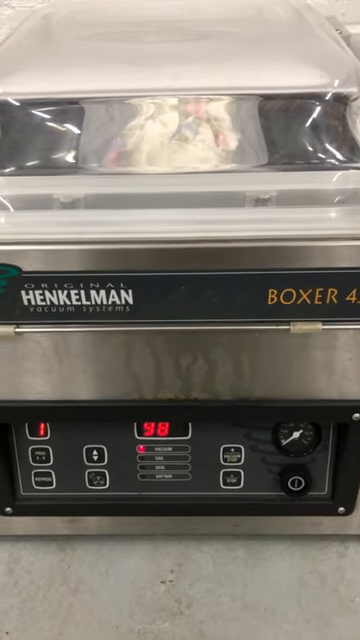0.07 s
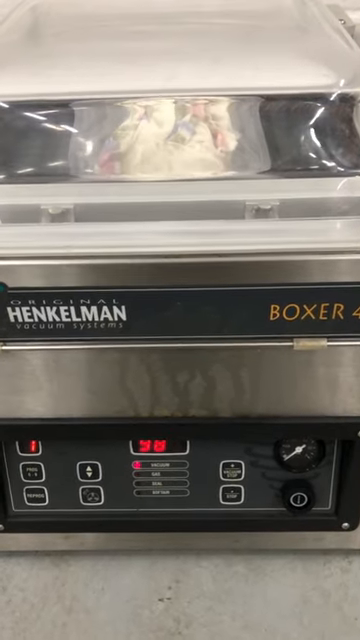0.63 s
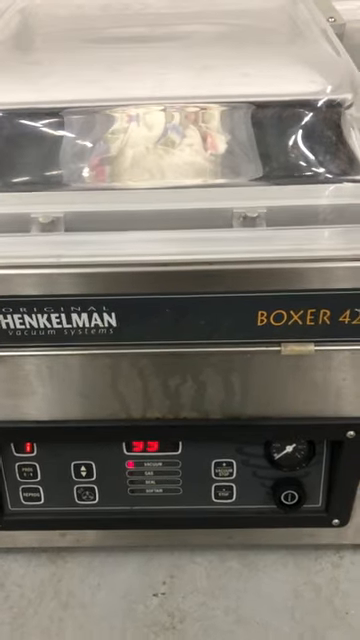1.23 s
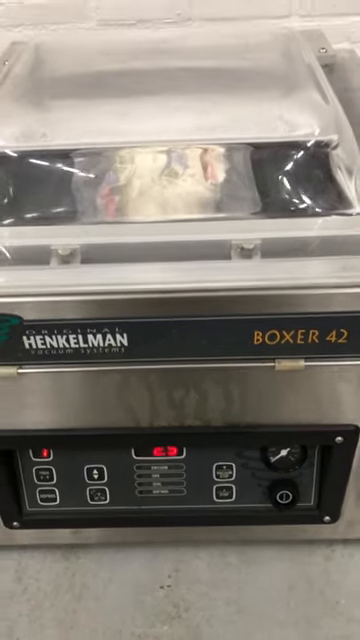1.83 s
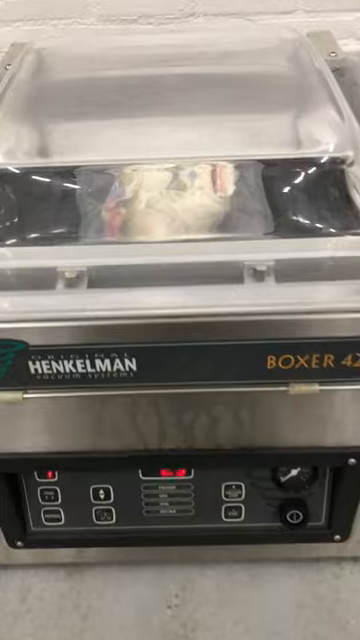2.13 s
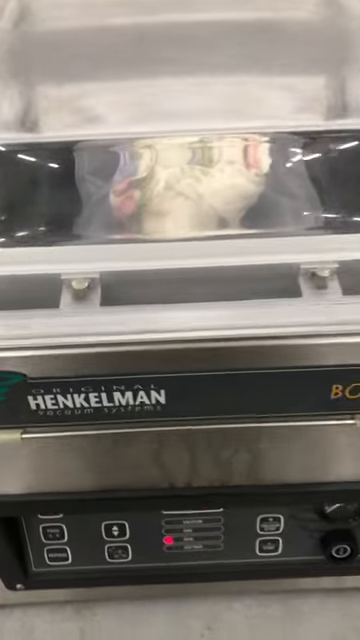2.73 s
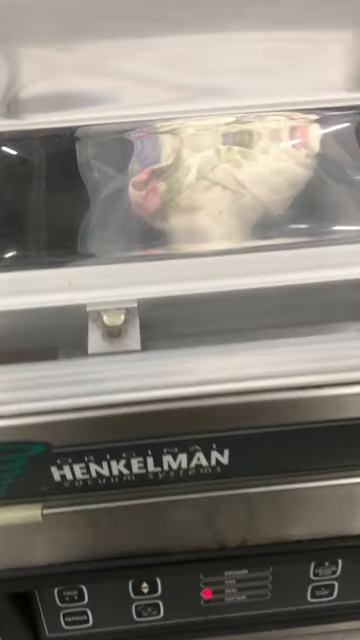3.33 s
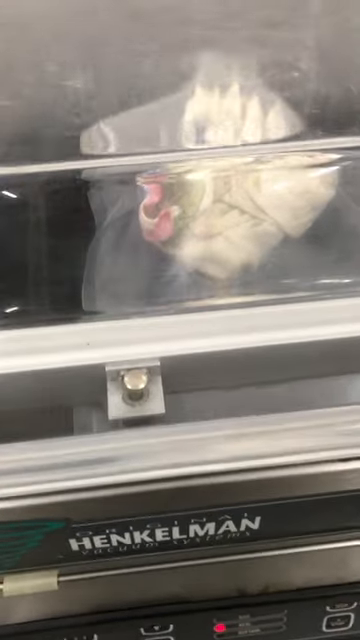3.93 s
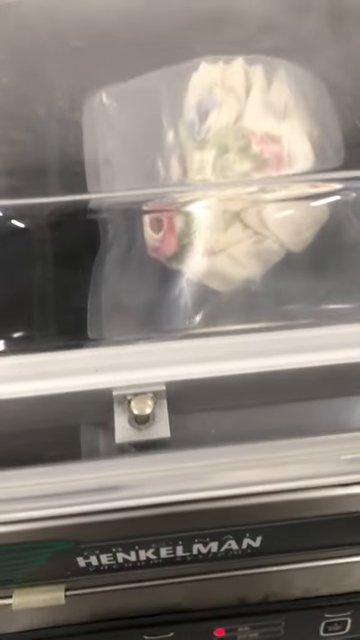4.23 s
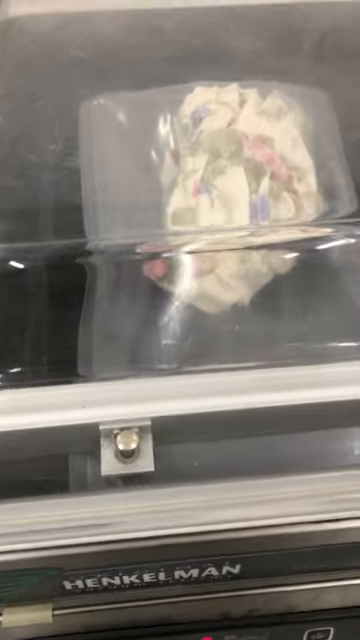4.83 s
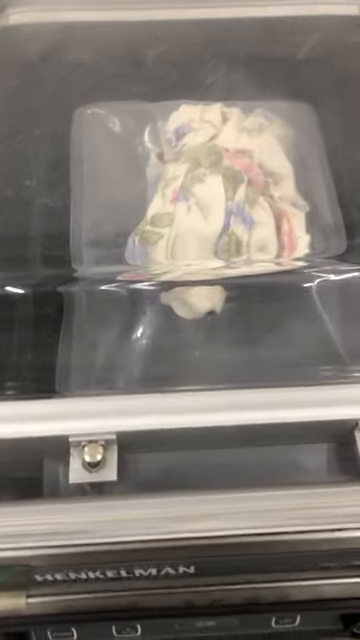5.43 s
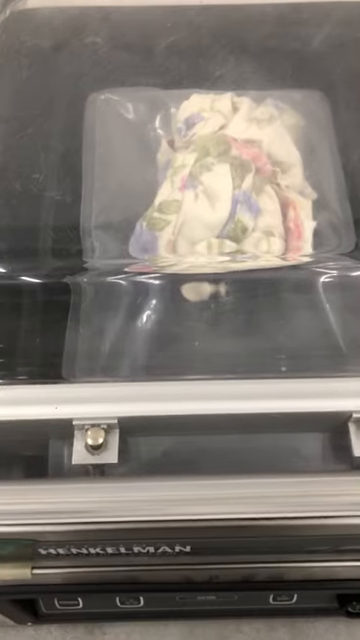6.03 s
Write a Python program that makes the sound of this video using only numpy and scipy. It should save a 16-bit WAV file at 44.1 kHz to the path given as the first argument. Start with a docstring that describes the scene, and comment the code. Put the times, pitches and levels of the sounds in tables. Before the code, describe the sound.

A loud vacuum sealing machine pump stops with a clack and hissing air, then the seal bar clunks and releases over steady ventilation.

```python
"""A hard-walled workroom, just in front of the lid of a chamber vacuum packer.
The vane pump drones, churns and rattles under the periodic pull of its motor, cuts out with a
double clack and runs down while a valve hisses and whistles. The heater transformer starts to sing
faintly; the seal bar clunks shut as air fills its cylinders, and a last clack releases it.
Film and lid tick now and then over the steady noise of the ventilation."""
import sys
import numpy as np
from scipy import signal
from scipy.fft import rfft, irfft
from scipy.io import wavfile
from scipy.ndimage import map_coordinates

SR = 44100
rng = np.random.default_rng(int(sys.argv[2]) if len(sys.argv) > 2 else 0)


def unload_audio(sound):
    """Save the sound as a 16-bit wav file, at the path given as the first command line argument."""
    columns = np.transpose(np.atleast_2d(sound))
    # keep every value between -1 and 1, then stretch to whole-number steps
    steps = np.round(np.clip(columns, -1, 1) * 32767)
    wavfile.write(sys.argv[1], SR, steps.astype(np.int16))


N = 272538
T = np.arange(N) / SR

# Levels in the tables are relative; each source applies its own gain.
# mains harmonics of the pump motor: (frequency [Hz], level [dB])
MOTOR_HARMONICS = [(100, -39), (200, -44.5), (250, -64.5), (300, -52), (350, -51.5), (400, -72),
                   (500, -52.5), (550, -56), (600, -58.5), (650, -78), (700, -52.5), (750, -49),
                   (850, -58.5), (900, -51), (1050, -55.5), (1550, -54.5), (1800, -56.5), (1850, -62),
                   (1900, -68), (2200, -59.5), (2400, -62.5), (3450, -64)]
# tones of the turning vanes: (frequency [multiple of shaft speed], level [dB])
VANE_ORDERS = [(3, -54.5), (7, -65), (12, -53.5), (18, -55.5), (19, -60), (23, -76), (30, -72.5),
               (33, -52.5), (42, -68), (60, -64), (80, -68)]
# oil and air churning in the pump: (frequency [Hz], level [dB])
CHURN_SPECTRUM = [(28, -43), (55, -30), (160, -2), (260, -5.5), (335, 5), (420, -1), (800, -3), (920, 3),
                  (1150, -1), (1560, 0.5), (1750, -5), (3400, -10), (4900, -17.5), (16000, -28.5)]
# buzz of the sliding vanes: (frequency [Hz], level [dB])
BUZZ_SPECTRUM = [(700, -39), (1100, -4), (1550, 3.5), (1750, -6), (2400, -8), (3500, -7), (3800, -21),
                 (4500, -4.5), (5200, -33), (9000, -21)]
# rattle of the housing: (frequency [Hz], level [dB])
RATTLE_SPECTRUM = [(1500, -18), (3000, 4.5), (5200, -6), (6500, 1), (7700, -2.5), (8800, 1), (11000, 0.5),
                   (12500, 4), (13500, -1.5), (16000, -1)]
# ventilation noise: (frequency [Hz], level [dB])
VENT_SPECTRUM = [(20, -43), (32, -19.5), (48, -2.5), (70, 1), (105, -0.5), (153, -3.5), (229, -5),
                 (270, -8.5), (489, -13), (677, -15), (1400, -21), (2410, -32), (14000, -46.5),
                 (16000, -51)]
# blows, by part: (time [s], level [dB], treble gain [dB], mid-band t60 [s], thump [dB], ring [dB])
IMPACTS = { "switch": [(1.5744, -24.5, 10, 0.14, -69, -56.5), (1.5995, -23, -3, 0.069, -38.5, -43)],
           "bar": [(2.566, -44, -3, 0.24, -85, -74.5), (2.5798, -16.5, 3.5, 0.064, -24.5, -38),
           (2.587, -25.5, 8.5, 0.097, -34, -61), (2.621, -43, -12, 0.1, -23.5, -73)],
           "release": [(5.063, -44.5, -5, 0.15, -86, -80), (5.0755, -26.5, 5, 0.1, -70, -47.5),
           (5.082, -33.5, -4, 0.08, -70, -70), (5.103, -33, -23, 0.12, -64, -51)], }
# colour of each striking part: (frequency [Hz], level [dB])
PART_SPECTRA = { "switch": [(60, -29), (170, -9), (450, -1.5), (650, -9), (1050, 6.5), (1300, 3.5),
                (1900, -5), (2300, -0.5), (3400, -7.5), (4500, -13), (8500, -14.5), (11000, -23),
                (16000, -21)], "bar": [(60, -46), (110, -23.5), (220, -3.5), (400, 0), (600, -11),
                (770, 2.5), (1100, -0.5), (1470, 5.5), (1900, 0), (2600, -8), (3300, 1.5), (3800, -4),
                (4300, -17), (5800, -14), (6900, -11), (8000, -21.5), (16000, -26)], "release": [(130, -29),
                (230, -6), (380, 0), (500, -5), (690, 0.5), (850, -2.5), (1300, 2.5), (2050, -6),
                (2750, -3.5), (3900, -11), (4500, -14.5), (7000, -19.5), (11000, -29.5), (16000, -28)], }
# modes of the steel panels: (frequency [Hz], level [dB], t60 [s])
PANEL_MODES = [(168.3, 0.5, 0.65), (207.4, 2.5, .4), (333, 2.5, 0.65), (372, 0.5, 0.26), (584, -7.5, 0.69),
               (782, -8, 0.79), (940, -25, 0.5), (1050, -2, 0.35), (1180, -7, 0.664), (1335, -23, .7),
               (1520, -15.5, .26), (3180, -24, 0.33), (3560, -22, 0.21)]
# the room's return of each part's sound: (level [dB])
REVERB_DB = {"switch": -16.5, "bar": -17, "release": -12.5}
# reverberation time of the room: (frequency [Hz], t60 [s])
ROOM_T60 = [(100, 1.48), (400, 0.91), (1200, 2), (3500, 1.23), (7000, 0.6), (15000, 0.33)]
# colour of the wall reflections: (frequency [Hz], level [dB])
WALL_SPECTRUM = [(170, -5.5), (330, 3.5), (1300, -4), (2500, -4.5), (7000, 0), (15000, 4.5)]
# air rushing through the valve: (frequency [Hz], level [dB])
HISS_SPECTRUM = [(1000, -18.5), (4500, -11), (6800, -3.5), (7900, -2), (8300, -5), (9600, -5),
                 (11500, -2.5), (12500, -3), (13800, 0), (15000, 0), (15500, 7), (16000, 1.5)]
# breathy whistle of the valve seat: (frequency [Hz], level [dB])
WHISTLE_SPECTRUM = [(6000, -38), (8200, -11), (8850, -5), (9500, -12.5), (12000, -50)]
# harmonics of the heater transformer: (frequency [Hz], level [dB])
CORE_HARMONICS = [(1500, -87.5), (1600, -83), (1700, -86.5), (1800, -76.5), (1900, -77), (2000, -74.5),
                  (2100, -74), (2200, -81.5), (2300, -81.5)]
# ticks of film and lid: (time [s], level [dB], centre frequency [Hz], half-width [octaves])
FILM_TICKS = [(2.189, -59, 11960, 0.81), (3.388, -68, 11000, .7), (3.6438, -45, 4100, 1.15),
              (3.942, -70, 9000, .9), (4.1955, -60, 13400, .3)]
# air filling the cylinders under the seal bar: (frequency [Hz], level [dB])
FILL_SPECTRUM = [(300, 3.5), (600, 0.5), (800, 9), (1000, -3.5), (1200, -6.5), (2300, -8), (3000, -4.5),
                 (3750, -10), (4200, -20), (5500, -20), (6500, -20), (8000, -51), (16000, -49.5)]

MAINS_HZ, PULL_HZ = 50, 100  # magnetic force peaks twice in each mains cycle
PUMP_DB, CUT_S = -1.53, 1.643  # the pump's gain holds until the power is cut


def amp(db):
    return 10 ** (np.asarray(db) / 20)


def unit(x):
    return x / np.sqrt(np.mean(x ** 2) + 1e-20)


def curve_at(points, hz):
    f, value = np.transpose(points)
    return np.interp(np.log(hz + 1), np.log(f + 1), value)


def add(mix, start_s, sound):
    part = mix[round(start_s * SR):][:len(sound)]
    part += sound[:len(part)]


def bins(size):
    return np.fft.rfftfreq(size, 1 / SR)


def ramp(start_s, length_s):
    return np.clip((T - start_s) / length_s, 0, 1)


def colour(x, spectrum, extra_db=0):
    """Linear filtering imposes a spectrum on x; the result has rms 1."""
    return unit(irfft(rfft(x) * amp(curve_at(spectrum, bins(len(x))) + extra_db), len(x)))


def drift(rate_hz):
    """Smooth random fluctuation, rms 1."""
    knots = rng.standard_normal(400)
    return unit(map_coordinates(knots, [T * rate_hz], order=2, mode="wrap"))


def ripple(spacing_hz):
    """The many small resonances of an enclosure make its frequency response uneven."""
    return map_coordinates(rng.standard_normal(4000), [bins(N) / spacing_hz], order=1, mode="wrap")


def turbulence(spectrum, ripple_db, spacing_hz):
    """Turbulent air radiates broadband noise, coloured by the resonances around it."""
    return colour(rng.standard_normal(N), spectrum, ripple_db * ripple(spacing_hz))


def tone(cycles, waver, rate_hz):
    """Standing waves make a partial's amplitude and phase wander as the listener moves."""
    wander = 1 + waver * (drift(rate_hz) + 1j * drift(rate_hz))
    phasor = np.exp(2j * np.pi * (cycles + rng.random()))
    return np.sqrt(2) * (wander * phasor).real / np.sqrt(1 + 2 * waver ** 2)


def contact_noise(periodic_share):
    """Rough contact makes noise, a share of whose power repeats with every mains cycle."""
    phases = rng.random(SR // MAINS_HZ // 2 + 1)
    periodic = np.resize(unit(irfft(np.exp(2j * np.pi * phases))), N)
    return np.sqrt(periodic_share) * periodic + np.sqrt(1 - periodic_share) * rng.standard_normal(N)


def run_down(db_per_s, braking_db_per_s2=45):
    """Once the drive is cut, the pump's vibration decays ever faster."""
    since = np.maximum(T - CUT_S, 0)
    return amp(PUMP_DB - db_per_s * since - braking_db_per_s2 * since ** 2)


def pump_drone(shaft_hz=48.15, coast_s=1.2):
    """Forced vibration: motor hum stays locked to the mains, while vane tones fall with the shaft."""
    turns = np.cumsum(shaft_hz * np.exp(-np.maximum(T - CUT_S, 0) / coast_s)) / SR
    hum = [amp(db) * tone(hz * T, waver=min(hz / 4000, 0.25), rate_hz=4) for hz, db in MOTOR_HARMONICS]
    vanes = sum(amp(db) * tone(order * turns, waver=0.65, rate_hz=7.55) for order, db in VANE_ORDERS)
    return hum[0] * run_down(65) + hum[1] * run_down(14.5) + (sum(hum[2:]) + vanes) * run_down(49)


def oil_churn():
    """Churning oil and air excite the housing's resonances, amplitude-modulated by the motor."""
    throb = 1 + 0.15 * np.cos(2 * np.pi * PULL_HZ * T)
    churn = colour(rng.standard_normal(N) * throb, CHURN_SPECTRUM, 3.4 * ripple(20))
    return amp(-41.5) * churn * (run_down(83) + amp(-9) * run_down(2.7))


def vane_buzz():
    """Sliding friction of the vanes makes a partly periodic buzz whose level flickers."""
    buzz = colour(contact_noise(periodic_share=0.39), BUZZ_SPECTRUM)
    return amp(-50.5 + 1.4 * drift(8.8)) * buzz * run_down(100)


def housing_rattle():
    """Each magnetic pull of the motor drives loose metal into a short burst of chatter."""
    since_pull = (T - 0.0033) % (1 / PULL_HZ)
    bursts = 0.29 + np.exp(-since_pull / 0.0045)
    chatter = contact_noise(periodic_share=0.47) * bursts
    return amp(-45.5) * colour(chatter, RATTLE_SPECTRUM, 2.7 * ripple(70)) * run_down(150)


def ventilation(shadow_db=-4.1):
    """Acoustic shadow: the lid screens the ventilation noise as the listener leans in over it."""
    lean = ramp(start_s=1.95, length_s=2.37)
    return amp(-52.5 + shadow_db * lean) * turbulence(VENT_SPECTRUM, ripple_db=0.76, spacing_hz=18)


def clatter(step=6):
    """Micro-impacts of random sign, one in every few samples, sum to a flat spectrum."""
    clicks = np.zeros(SR)
    slots = np.arange(0, SR - step, step)
    clicks[slots + rng.integers(0, step, len(slots))] = rng.choice([-1., 1.], len(slots))
    return clicks


def impact(part, db, treble_db, t60, thump_db, ring_db, rise_s=0.0008, swell_s=0.0045):
    """An impact excites damped vibration: clatter that lasts longest in the bass, and ringing modes."""
    t, hz = T[:SR], bins(SR)
    bass = 1 / (1 + (hz / 600) ** 2)
    treble = 1 / (1 + (4800 / (hz + 1)) ** 4)
    spectrum = rfft(colour(clatter(), PART_SPECTRA[part], treble_db * treble))
    bands = [(bass, 1.5), (1 - bass - treble, 1), (treble, 0.85)]  # (weight, factor on t60)
    hit = sum(irfft(spectrum * weight, SR) * amp(-60 * t / (t60 * factor)) for weight, factor in bands)
    ring = sum(amp(ring_db + mode_db - 60 * t / mode_t60) * np.sin(2 * np.pi * mode_hz * t)
               for mode_hz, mode_db, mode_t60 in PANEL_MODES)
    thump = amp(thump_db - 60 * t / 0.09) * np.sin(2 * np.pi * 164.5 * t)  # the case rocks on its feet
    return amp(db) * hit * (1 - np.exp(-t / rise_s)) + (ring + thump) * (1 - np.exp(-t / swell_s)) ** 2


def reverberation(x, delay_s=0.0051, build_s=0.0095):
    """Wall reflections merge into a diffuse field whose treble dies first."""
    hz, t, noise = signal.stft(rng.standard_normal(SR), SR, nperseg=256)
    fade_db = curve_at(WALL_SPECTRUM, hz)[:, None] - 60 * t / curve_at(ROOM_T60, hz)[:, None]
    tail = signal.istft(noise * amp(fade_db), SR, nperseg=256)[1][:SR]
    tail *= ramp(delay_s, build_s)[:SR]
    return signal.fftconvolve(x, tail / np.linalg.norm(tail))[:N]


def mechanism_clacks(cutoff_hz=105):
    """Pump switch, seal bar and release strike the case, which radiates poorly below its cutoff."""
    out = np.zeros(N)
    for part, rows in IMPACTS.items():
        direct = np.zeros(N)
        for start_s, *settings in rows:
            add(direct, start_s, impact(part, *settings))
        out += direct + amp(REVERB_DB[part]) * reverberation(direct)
    return signal.sosfilt(signal.butter(3, cutoff_hz, "high", fs=SR, output="sos"), out)


def flow(open_s, db, sag_db_per_s):
    """Flow noise rises as a valve opens and sags with the pressure that drives it."""
    return ramp(open_s, length_s=0.033) * amp(db - sag_db_per_s * np.maximum(T - open_s, 0))


def equalise(end_s, fall_db_per_s=262):
    """As the pressures even out, a flow's gain rounds off from 1 into a steep fall."""
    return 1 / (1 + amp(fall_db_per_s * np.minimum(T - end_s, 1)))


def valve_air(open_s=1.585, end_s=1.953, whistle_lag_s=0.088):
    """A pressure drop drives a hissing jet; the seat's whistle sags faster but is cut off later."""
    rush = flow(open_s, db=-41.5, sag_db_per_s=7.5) * equalise(end_s)
    seepage = flow(open_s, db=-76, sag_db_per_s=12)
    jet = flow(open_s, db=-48, sag_db_per_s=31.5) * equalise(end_s + whistle_lag_s)
    hiss = turbulence(HISS_SPECTRUM, ripple_db=1.6, spacing_hz=113.4)
    whistle = turbulence(WHISTLE_SPECTRUM, ripple_db=2.2, spacing_hz=60)
    return hiss * (rush + seepage) + whistle * jet


def transformer_singing():
    """The core sings at harmonics of the magnetic pull; slowly the even ones grow and the odd fade."""
    swing_db = 3 * (2 * ramp(start_s=3.4, length_s=1.3) - 1)
    singing = np.zeros(N)
    for hz, db in CORE_HARMONICS:
        order = round(hz / PULL_HZ)
        singing += amp(db + (-1) ** order * swing_db) * tone(hz * T, waver=0.097, rate_hz=2.08)
    return amp(-2) * singing * ramp(start_s=1.64, length_s=0.88)


def film_ticks():
    """Film and lid emit band-limited transients: a snap, a short rustle and the room's return."""
    out, t, hz = np.zeros(N), T[:4096], bins(4096)
    envelope = np.exp(-t / 0.0017) + 0.12 * np.exp(-t / 0.016)
    for start_s, db, centre_hz, octaves in FILM_TICKS:
        band = 1 / (1 + (np.log2((hz + 1) / centre_hz) / octaves) ** 4)
        noise = unit(irfft(rfft(rng.standard_normal(len(t))) * band))
        add(out, start_s, amp(db) * noise * envelope)
    return out + amp(-15) * reverberation(out)


def cylinder_fill():
    """Air fills the seal bar's cylinders ever more slowly as the driving pressure falls."""
    rush = turbulence(FILL_SPECTRUM, ripple_db=1.53, spacing_hz=29.98)
    return rush * flow(open_s=2.585, db=-45, sag_db_per_s=31)


def scene():
    """Superposition: the pressures of all sources add in one channel."""
    pump = pump_drone() + oil_churn() + vane_buzz() + housing_rattle()
    return (pump + ventilation() + mechanism_clacks() + valve_air()
            + transformer_singing() + film_ticks() + cylinder_fill())[None]


def record(dry, cutoff_hz=15850):
    """A steep low-pass filter limits the bandwidth."""
    lowpass = signal.firwin(511, cutoff_hz, window=("kaiser", 9), fs=SR)
    return signal.oaconvolve(dry, lowpass[None], "same")


dry = scene()
out = record(dry)
unload_audio(out)
```